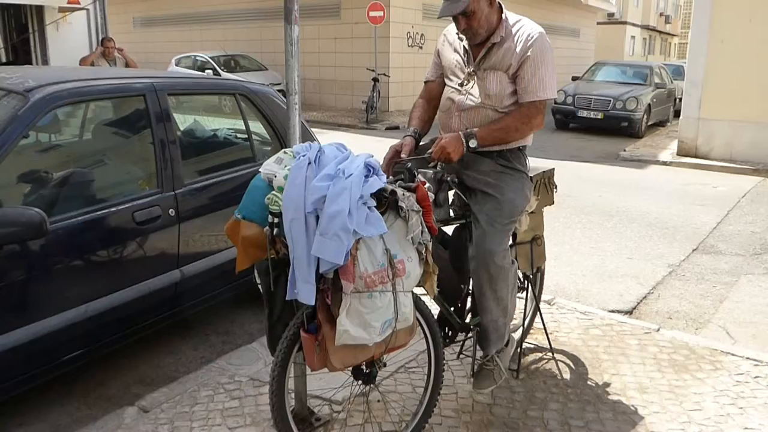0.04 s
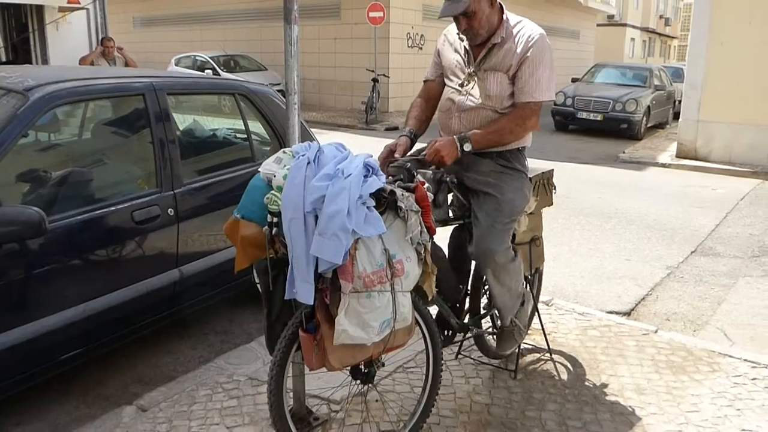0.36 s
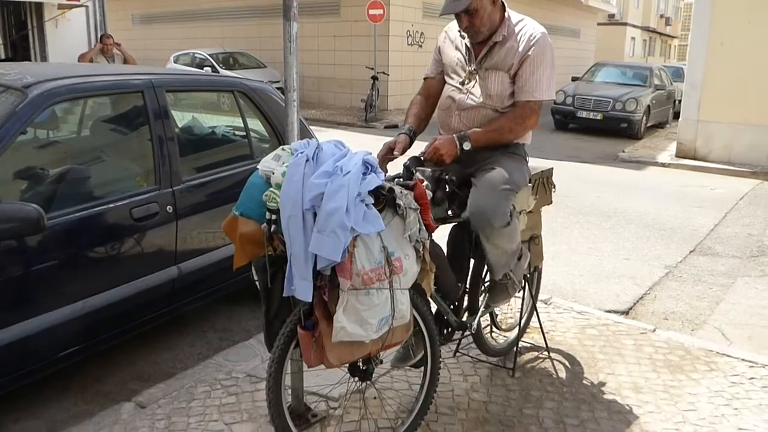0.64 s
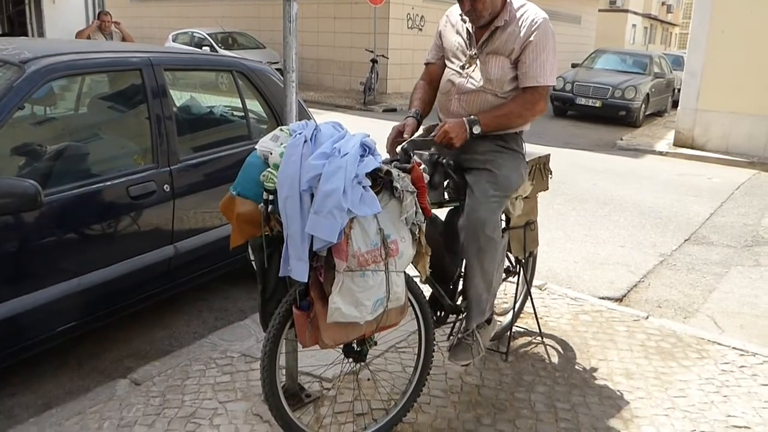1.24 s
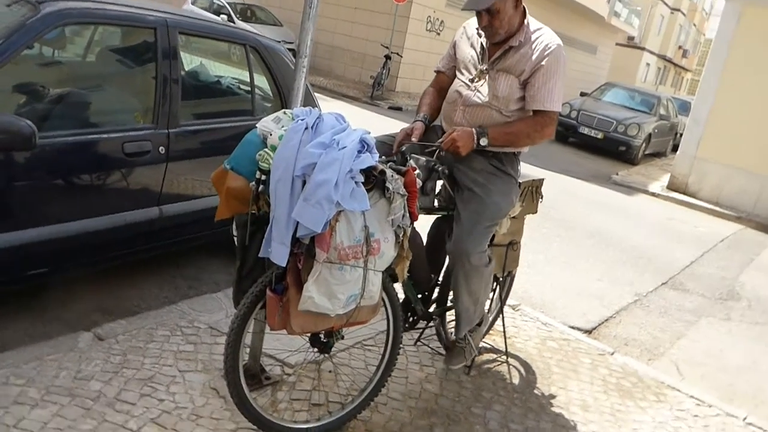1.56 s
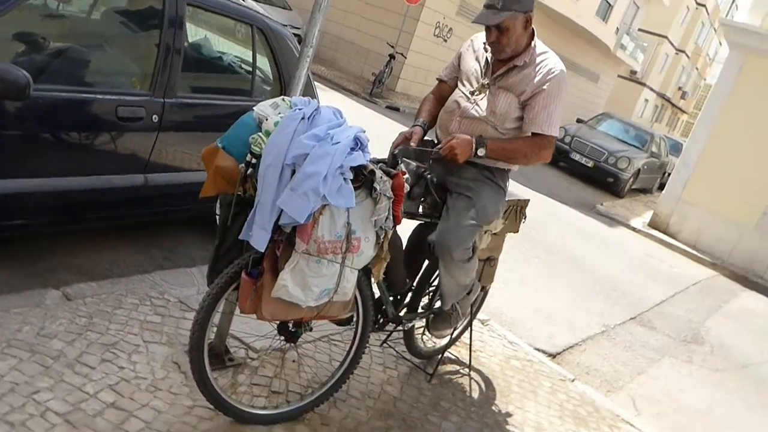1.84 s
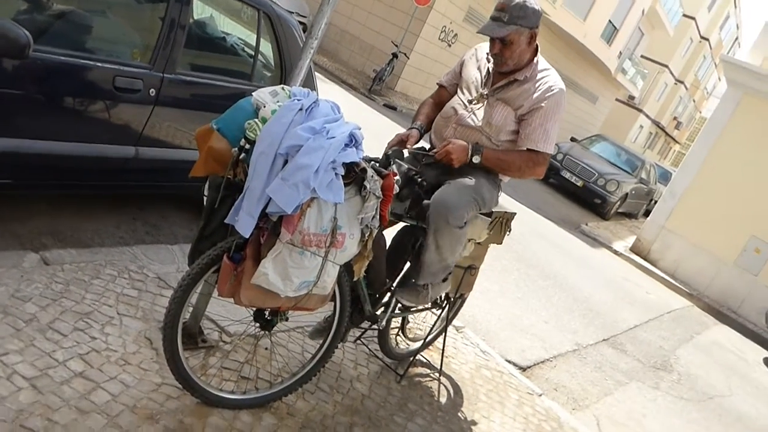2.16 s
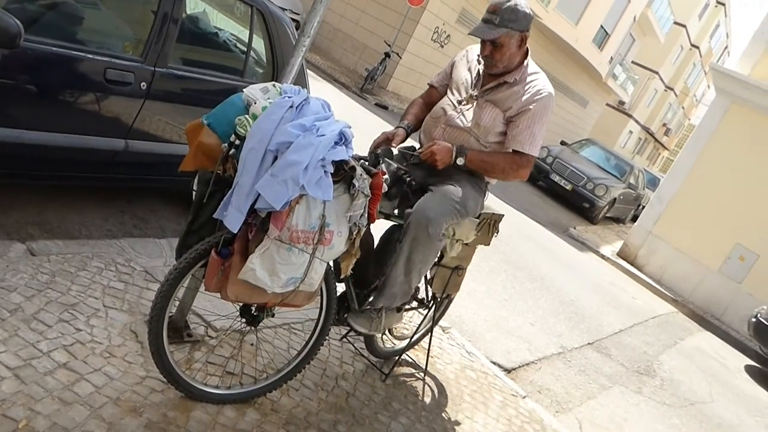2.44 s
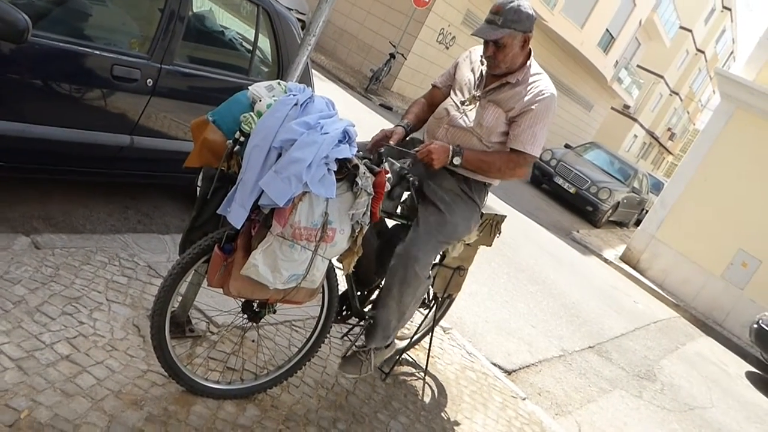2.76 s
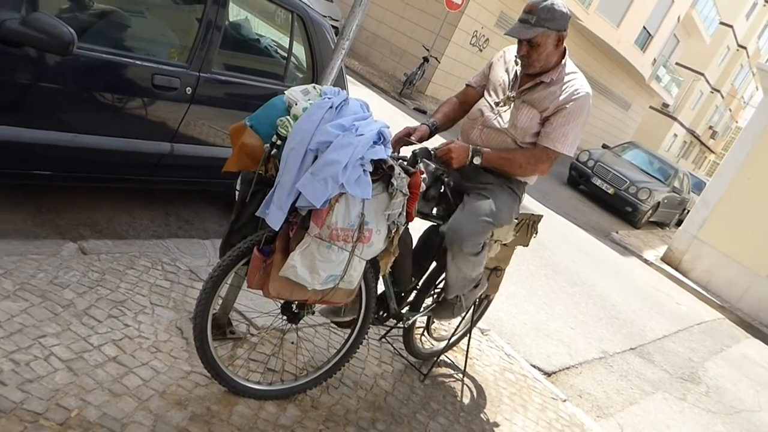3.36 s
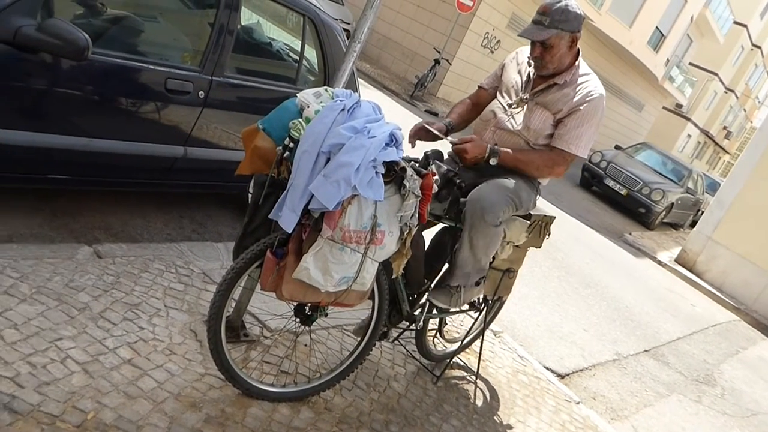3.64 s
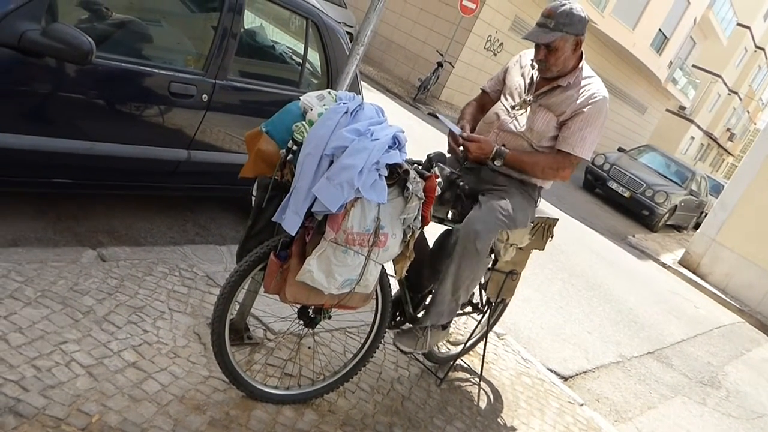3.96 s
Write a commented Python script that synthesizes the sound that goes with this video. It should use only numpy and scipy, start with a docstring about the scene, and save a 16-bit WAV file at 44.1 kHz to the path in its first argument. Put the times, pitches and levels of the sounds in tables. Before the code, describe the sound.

Steel blade hissing and chattering against a spinning grindstone, then drawn off with a short squeal.

```python
"""A street, where a knife is held on a pedal-driven grindstone. Grit scratches the steel into a bright hiss;
the stone runs out of true, so the blade chatters once a turn until it is pressed flat and rings.
The blade is drawn off with a rising zing and a short squeal, and the drive rumbles and ticks on
over a bed of traffic."""
import sys
import numpy as np
from scipy import signal
from scipy.fft import rfft, irfft
from scipy.io import wavfile
from scipy.ndimage import map_coordinates

SR = 44100
rng = np.random.default_rng(int(sys.argv[2]) if len(sys.argv) > 2 else 0)


def digitize_waveform(pressure):
    """Quantize a signal to 16-bit integers and store it at the path in sys.argv[1].

    Rows of a 2-D input are taken as channels; values are limited to [-1, 1].
    """
    field = np.atleast_2d(pressure).T
    bounded = np.clip(field, -1, 1)
    quanta = np.round(bounded * 32767).astype(np.int16)
    wavfile.write(sys.argv[1], SR, quanta)


N = 176400
TIME = np.arange(N) / SR


def amp(db):
    """Decibels to gain."""
    return 10 ** (np.asarray(db) / 20)


def unit(x):
    """Scales to rms 1."""
    return x / np.sqrt(np.mean(x ** 2) + 1e-20)


def curve(rows, column=1):
    """One column of a time table as an envelope."""
    rows = np.array(rows)
    return np.interp(TIME, rows[:, 0], rows[:, column])


def read(points, hz):
    """Reads a spectrum table on a log-frequency axis."""
    f, value = np.transpose(points)
    return np.interp(np.log(hz + 1), np.log(f + 1), value)


def colour(x, gain, size=4096):
    """Minimum-phase EQ shaped by gain(hz); keeps the power of white noise."""
    log_gain = np.log(np.maximum(gain(abs(np.fft.fftfreq(size, 1 / SR))), 1e-5))
    taps = np.fft.ifft(np.exp(np.conj(signal.hilbert(log_gain)))).real[:size // 2]
    return signal.oaconvolve(x, taps / np.linalg.norm(taps))[:N]


def tint(x, points):
    """Colours x by an EQ table."""
    return colour(x, lambda hz: amp(read(points, hz)))


def wander(hz):
    """Smooth random modulation up to about hz, rms 1."""
    f = np.fft.rfftfreq(N, 1 / SR)
    return unit(irfft(rfft(rng.standard_normal(N)) / (1 + (f / hz) ** 4), N))


def whistle(hz, width_hz):
    """A narrow band of noise that follows hz."""
    phase = 2 * np.pi * np.cumsum(hz * np.ones(N)) / SR
    return unit(wander(width_hz / 2) * np.cos(phase) + wander(width_hz / 2) * np.sin(phase))


def grains(per_s, spread_db):
    """Random tiny impacts of uneven size."""
    size = amp(spread_db * np.minimum(rng.exponential(1, N), 5))
    return unit(size * rng.choice([-1, 1], N) * (rng.random(N) < per_s / SR))


def bursts(events, eq, decay_s):
    """Short noise hits that die away, all through one EQ."""
    envelope = sum(amp(db) * (TIME >= s) * np.exp(-abs(TIME - s) / decay_s) for s, db in events)
    return tint(envelope * rng.standard_normal(N), eq)


def street():
    """A bed of traffic rumble with two faint machine hums."""
    # traffic EQ (frequency [Hz], gain [dB])
    traffic_eq = [(18, -69), (30, -40), (59, -54), (77, -16), (133, -5.5), (341, -3.5), (399, -8),
                  (532, -3), (591, -3), (639, -7), (830, -9), (897, -18), (1110, -9), (1820, -24),
                  (2760, -25), (3490, -23), (3980, -36), (4910, -42), (6890, -33), (10200, -29.5),
                  (15500, -53)]
    # steady hums (frequency [Hz], level [dB])
    hums = [(269, -57.5), (1022, -59.5)]
    rumble = tint(rng.standard_normal(N) * amp(wander(hz=25)), traffic_eq)
    return amp(-45.5) * rumble + sum(amp(db) * whistle(hz, width_hz=8.4) for hz, db in hums)


def frame():
    """The stone's small knocks shake the frame that carries it into a rumble."""
    # body of stone and frame (frequency [Hz], gain [dB])
    body_eq = [(35, -57), (60, -35), (91, -8), (168, -14), (304, -1), (384, -4), (471, 6.5), (550, -8),
               (604, -0.5), (674, -11.5), (752, -3.5), (893, -10.5), (1030, -5), (1090, -19), (1180, -10.5),
               (1720, -18), (2500, -17), (3250, -26.5), (5500, -120)]
    # rumble envelope (time [s], level [dB])
    level = [(.4, -46), (.445, -39), (.57, -43.5), (.65, -37.5), (.72, -41), (1.0, -45), (1.3, -42.5),
             (1.55, -43.5), (1.7, -40.5), (2.17, -45), (2.33, -41), (2.5, -42.5), (2.72, -45.5),
             (2.98, -39.5), (3.2, -46), (3.28, -40), (3.36, -44), (3.55, -44.5), (3.65, -43), (3.73, -48.5)]
    return tint(grains(per_s=1400, spread_db=3.5) * amp(curve(level)), body_eq)


def drive():
    """The pedal drive clacks under load and ticks lightly once the blade is off."""
    # hits under load (time [s], level [dB])
    clacks = [(1.686, -36.5), (1.787, -38), (2.08, -37.5), (2.503, -35)]
    # their dull tone (frequency [Hz], gain [dB])
    clack_eq = [(150, -23), (450, 1), (750, 6), (1250, 6), (1800, -8), (5000, -45), (15000, -47)]
    # free-running hits (time [s], level [dB])
    ticks = [(3.705, -47), (3.73, -42.5), (3.748, -49), (3.7795, -41), (3.8073, -43.5), (3.8294, -36.5),
             (3.885, -43), (3.9096, -50), (3.957, -43.5), (3.9845, -41.5)]
    # their bright tone (frequency [Hz], gain [dB])
    tick_eq = [(400, -8), (1500, 6.5), (3800, 4), (5000, -11), (9000, -1), (15000, -27)]
    return bursts(clacks, clack_eq, decay_s=.01) + bursts(ticks, tick_eq, decay_s=.0042)


def contact(low_spot_s=.441):
    """Force between blade and stone: the rim's shape once a turn, uneven hands and fast judder."""
    # the stone surges with the pedal strokes (time [s], speed [turns/s])
    speed = [(.4, 22.46), (.85, 22.45), (1.12, 20.29), (1.4, 22.07), (1.62, 20.92), (1.95, 23.46),
             (2.2, 21.88), (2.55, 23.68), (2.9, 22.42), (3.15, 22.53), (3.45, 19.21), (4, 19.44)]
    # contact round the rim (position from the low spot [turns], level [dB])
    rim = [(0, -12), (.11, -6), (.2, 3.5), (.38, 1.2), (.5, -1), (.68, 2.5), (.81, 1.2), (.9, -5)]
    # chatter (time [s], depth [multiple of the rim's dB swing])
    chatter = [(.4, 1.15), (.9, 1.1), (1.1, .8), (1.25, 1.1), (1.66, 1), (1.78, .3), (2.3, .15), (2.8, .25),
               (3.15, .65), (3.35, .6), (3.55, .85)]
    turns = np.cumsum(curve(speed)) / SR
    turns -= np.interp(low_spot_s, TIME, turns)
    rim_db = np.interp(turns, *np.transpose(rim), period=1) * curve(chatter)
    hands_db, judder_db = 1.18 * wander(hz=13.6), 1.2 * wander(hz=130)
    return unit(amp(rim_db + hands_db + judder_db))


def shifting(x, depth_db=3.9, patch_s=.19, patch_hz=430, size=512):
    """The contact point wanders, so narrow bands swell and fade."""
    hz, t, spectra = signal.stft(x, SR, nperseg=size, noverlap=size * 3 // 4)
    per_s, per_hz = np.fft.fftfreq(len(t), t[1])[:, None], np.fft.fftfreq(len(hz), hz[1])
    blur = np.exp(-(per_s * patch_s) ** 2 - (per_hz * patch_hz) ** 2)
    patches = np.fft.ifft2(np.fft.fft2(rng.standard_normal(blur.shape)) * blur).real
    gain = unit(amp(depth_db * unit(patches)))
    return signal.istft(spectra * gain.T, nperseg=size, noverlap=size * 3 // 4)[1][:N]


def scrape(force):
    """Coarse grit crunches under the hiss, barely following the force."""
    # scrape envelope (time [s], level [dB])
    level = [(.4, -42), (.5, -51), (.9, -46), (1.15, -46), (1.6, -46.5), (2.2, -47), (2.6, -53.5),
             (2.85, -45), (3.15, -49.5), (3.42, -45), (3.55, -45), (3.62, -49), (3.73, -57.5)]
    # midrange bite (frequency [Hz], gain [dB])
    scrape_eq = [(500, -18.5), (1300, 0), (1900, -6.5), (2500, -3.5), (3400, 1.5), (4200, -5), (5300, -5),
                 (6200, -2.5), (10000, -19.5)]
    crunch = shifting(grains(per_s=7000, spread_db=2.5)) * force ** .085
    return tint(crunch * amp(curve(level)), scrape_eq)


def draw_off(force):
    """The blade is drawn off with a rough, rising zing; the tip squeals as it leaves the stone."""
    # zing sweep (time [s], pitch [Hz], level [dB])
    rise = [(3.21, 1996, -73), (3.245, 2057, -48), (3.29, 2200, -56), (3.35, 2400, -52.5),
            (3.41, 2620, -45), (3.45, 2620, -51), (3.48, 2740, -72)]
    # squeal sweep (time [s], pitch [Hz], level [dB])
    fall = [(3.5, 8700, -49), (3.555, 8300, -37.5), (3.575, 8140, -42), (3.59, 8040, -85)]
    roughness = unit(amp(3.5 * wander(hz=90)))
    zing = whistle(curve(rise), width_hz=300) * amp(curve(rise, column=2)) * roughness
    squeal = whistle(curve(fall), width_hz=1100) * amp(curve(fall, column=2))
    return (zing + squeal) * np.sqrt(force)


def steel(x, pose, low_cut_hz=420):
    """Broad hiss plus the blade's modes for one pose: 0 tilted up, 1 along the edge, 2 lying flat."""
    # hiss EQ (frequency [Hz], tilted gain [dB], edge gain [dB], flat gain [dB])
    hiss = [(1180, -3, -3, -3), (2480, -1.5, -4, -4), (4200, -8, -6.0, -5.5), (6500, -15, -4, -11.0),
            (10100, -16.0, 5.5, -2), (15500, -8.5, -4, -5.5)]
    # blade modes (frequency [Hz], width [Hz], tilted gain [dB], edge gain [dB], flat gain [dB])
    modes = [(3240, 150, 5, -4, -1), (3634, 91, 6.5, 7.5, -5), (4830, 190, -3, -2, -8),
             (6000, 590, -5, -1, 4.5), (6330, 100, -12, -12, 6.5), (7140, 920, 0.0, 0.5, 0),
             (7560, 170, 13, 6.5, 3), (8130, 160, 2, -15, -4.5), (8820, 300, 8.5, 3.5, 5.0),
             (9800, 640, 8, 8, 15.5), (9700, 150, 6, 6, 15), (10400, 700, 10, -11.0, 10.5),
             (11130, 750, -16.5, 2.5, 4.5), (11000, 91, -20, -12, 3), (12040, 260, 12.5, 11.5, 7),
             (13200, 750, 3, -0.5, -8), (14100, 750, 4, -9.5, -8.5), (15400, 150, -2.0, -4, -10)]

    def gain(hz):
        hiss_power = amp(read(np.array(hiss)[:, [0, pose + 1]], hz)) ** 2
        ring_power = sum(amp(db[pose]) ** 2 / (1 + 2 * ((hz - centre) / width) ** 2) ** 2
                         for centre, width, *db in modes)
        low_cut = hz ** 2 / (hz ** 2 + low_cut_hz ** 2)  # a thin blade radiates little bass
        return low_cut * np.sqrt(hiss_power + ring_power)
    return colour(x, gain)


def sliding(x, drift_s=.0008):
    """The ring drifts a little in pitch as the blade slides over the stone."""
    return map_coordinates(x, [(TIME + drift_s * wander(hz=3)) * SR], order=5)


def blade(force, lift_s=.066):
    """Grit scratches the steel into a hiss and ring whose tone follows how the blade is held."""
    # pressure on the stone (time [s], level [dB])
    pressure = [(0.42, -34.5), (0.46, -37.5), (0.51, -38.5), (0.555, -35.5), (0.6, -36.5), (0.77, -37),
                (0.82, -33), (0.87, -37.5), (1.0, -39.5), (1.15, -39.5), (1.25, -37), (1.42, -36.5),
                (1.52, -36.5), (1.62, -39), (1.7, -39.5), (1.77, -34.5), (1.88, -31.5), (1.94, -32.5),
                (1.99, -32.5), (2.1, -34.5), (2.31, -38.5), (2.42, -34), (2.55, -32.5), (2.68, -33.0),
                (2.8, -36.5), (2.87, -38.5), (2.95, -38.0), (3.15, -38), (3.35, -39.5), (3.4, -37),
                (3.46, -37.5), (3.5, -35), (3.53, -37.0), (3.56, -37), (3.592, -42), (3.604, -41.5),
                (3.618, -51.5)]
    # pose crossfade (time [s], tilted share [0-1], flat share [0-1]); the rest rides along the edge
    hold = [(.9, 0.92, 0), (1.05, 0.17, 0), (1.7, 0.085, 0.17), (1.77, 0.27, 0.59), (1.98, 0.012, 0.96),
            (2.6, 0, 1), (2.79, 0, 0.73), (2.92, 0.13, 0.14), (3.55, 0, 0.14)]
    tilted, flat = curve(hold), curve(hold, column=2)
    shares = tilted, np.clip(1 - tilted - flat, 0, 1), flat
    touching = np.clip((pressure[-1][0] + lift_s - TIME) / lift_s, 0, 1)
    grit = unit(shifting(grains(per_s=18000, spread_db=2)))
    scratch = grit * force * amp(curve(pressure)) * touching
    return sliding(sum(steel(scratch * share, pose) for pose, share in enumerate(shares)))


def scatter(x, decay_s, size=8192):
    """Reflections from pavement, cars and walls, at about the power of x."""
    taps = rng.standard_normal(size) * np.exp(-TIME[:size] / decay_s)
    return signal.oaconvolve(x, taps / np.linalg.norm(taps))[:N]


def scene():
    """All sources in a close, left-leaning stereo image, with reflections arriving from the sides."""
    # pan (frequency [Hz], left over right [dB])
    balance = [(60, 13), (140, 11), (210, 13.2), (330, 15.7), (490, 28), (620, 17.6), (770, 9.9),
               (1170, 3.7), (1790, 1.2), (2740, 0.5), (6410, 0.79), (9810, 3.7), (15000, 8)]
    # phase between the channels (frequency [Hz], left lead [rad])
    lead = [(20, 1), (250, -0.5), (400, 2.5), (480, 8), (560, -3), (800, -3), (1600, -2.5), (4300, -1.65),
            (7600, -1), (14000, -0.5)]
    # reflection send (frequency [Hz], gain [dB])
    send = [(60, -24), (250, -30), (500, -30), (1200, -19), (3000, -10), (6000, -8), (10000, -10),
            (15000, -7.5)]
    force = contact()
    mix = blade(force) + scrape(force) + draw_off(force) + drive() + frame() + street()
    hz = np.fft.rfftfreq(N, 1 / SR)
    right = amp(-read(balance, hz)) * np.exp(-1j * read(lead, hz))
    pan = np.array([np.ones(len(hz)), right]) / abs((1 + right) / 2)
    reflections = scatter(mix, decay_s=.006) + amp(-6) * scatter(mix, decay_s=.06)
    sides = rfft(reflections) * amp(read(send, hz)) * abs(pan[0]) * [[.5], [-1]]
    return irfft(rfft(mix) * pan + sides, N)


def record(dry):
    """Silence, an abrupt fade-in, and a steep high cut over the whole mix."""
    start_s, fade_s, cut_hz = .3928, .011, 15680
    opened = dry * np.clip((TIME - start_s) / fade_s, 0, 1)
    high_cut = signal.firwin(401, cut_hz, window=("kaiser", 9), fs=SR)
    return signal.oaconvolve(opened, high_cut[None], "same")


dry = scene()
out = record(dry)
digitize_waveform(out)
```